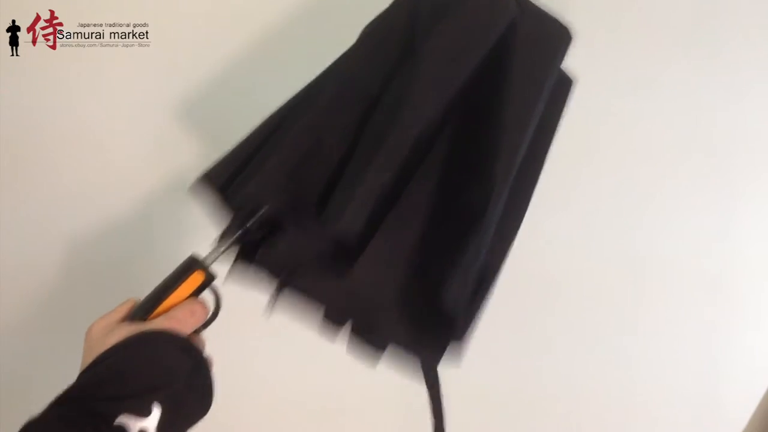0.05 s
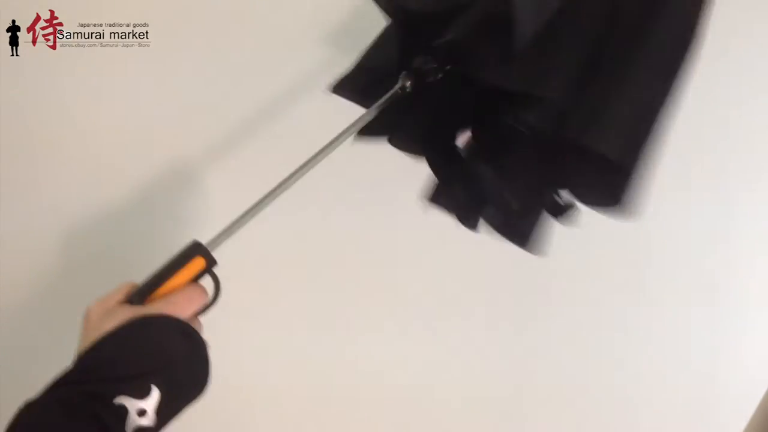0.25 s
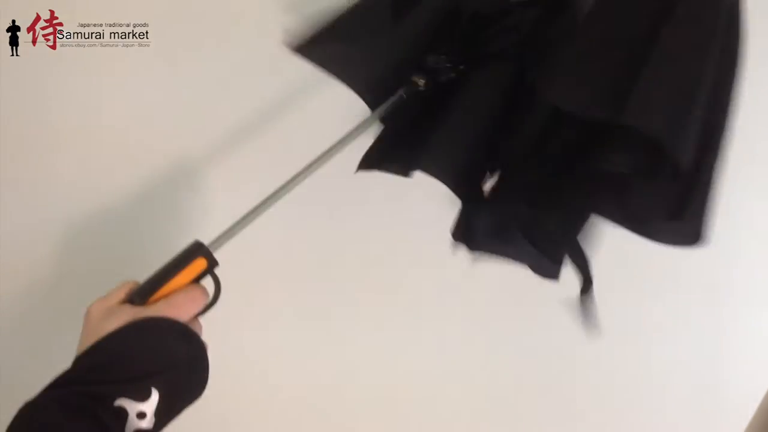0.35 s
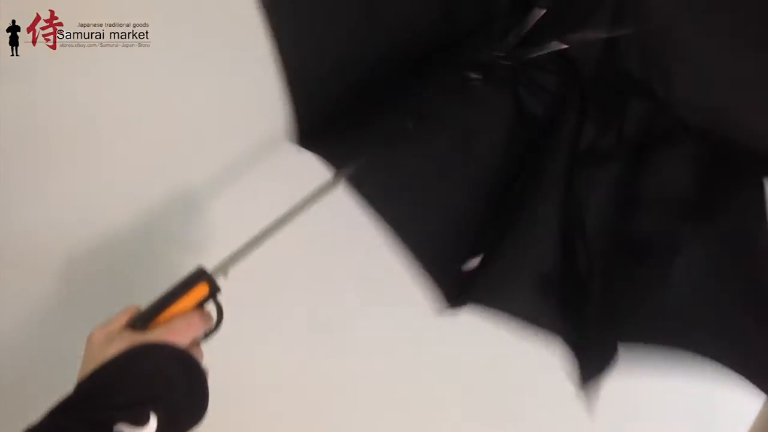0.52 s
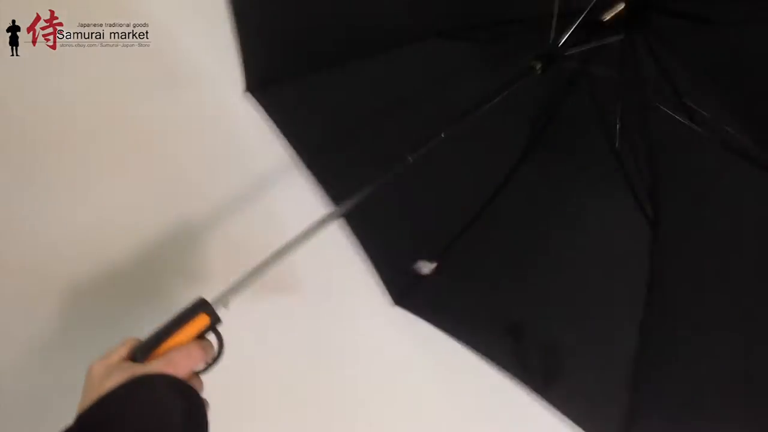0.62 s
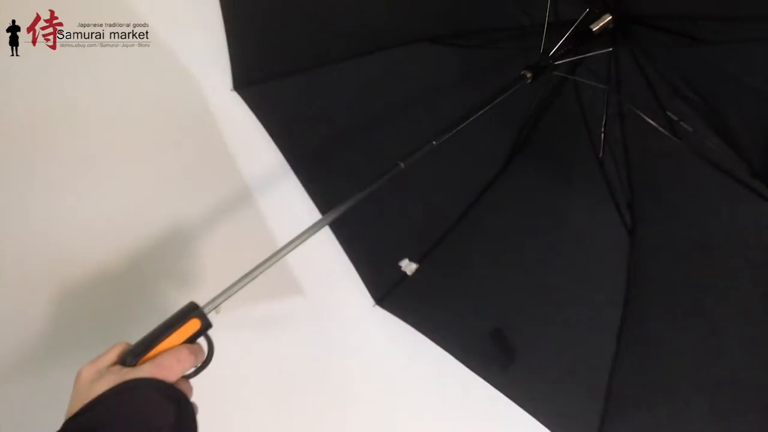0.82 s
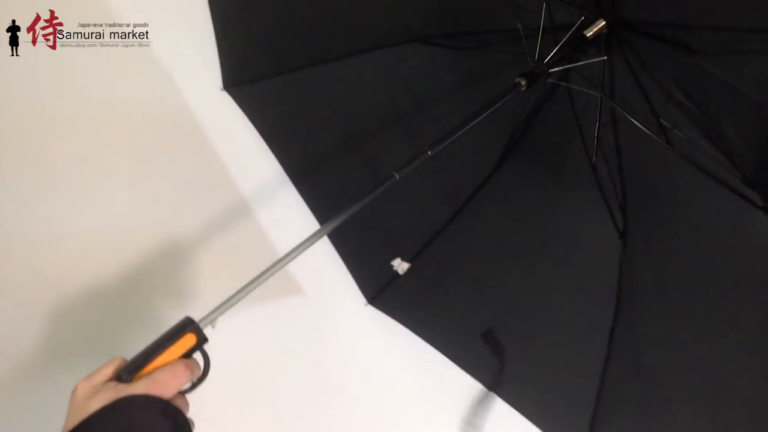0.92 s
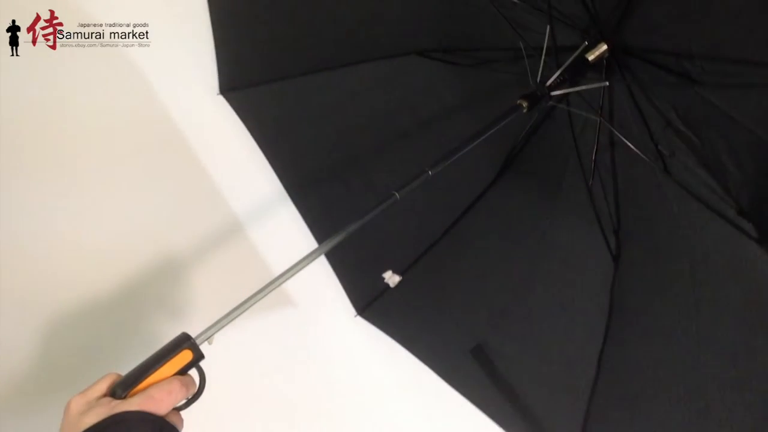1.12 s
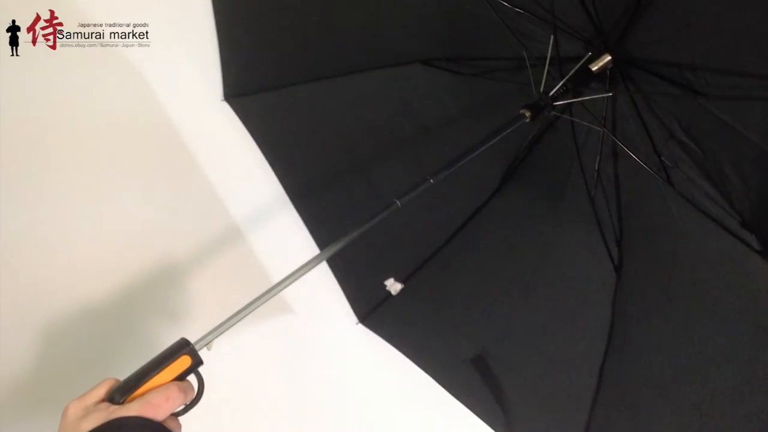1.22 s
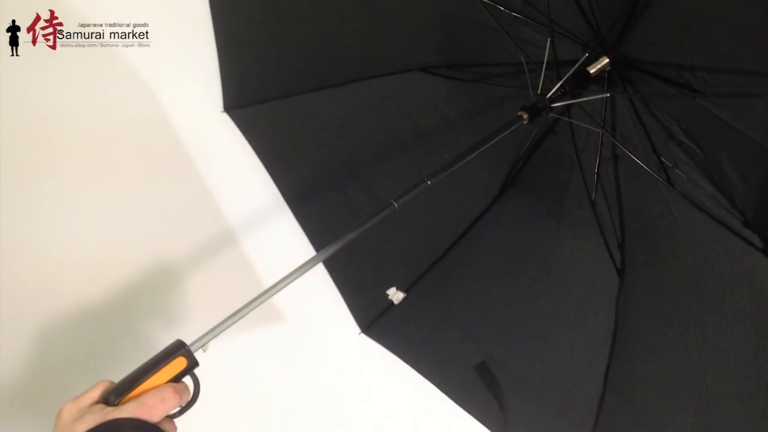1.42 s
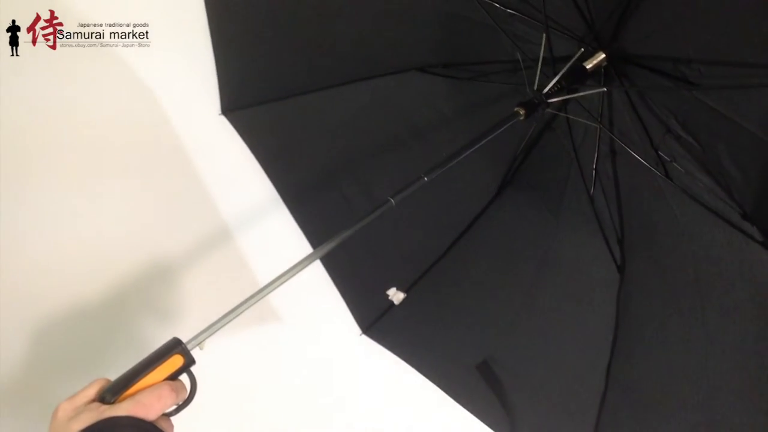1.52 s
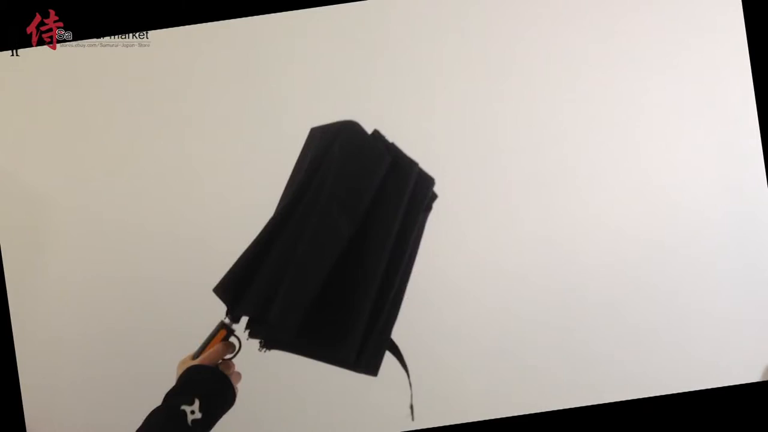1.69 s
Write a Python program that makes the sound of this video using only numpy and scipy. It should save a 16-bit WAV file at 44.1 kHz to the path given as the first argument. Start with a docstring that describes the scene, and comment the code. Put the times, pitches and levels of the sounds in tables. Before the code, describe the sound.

A spring-loaded umbrella clicks, bangs out and snaps open with a swish of nylon.

```python
"""A catch clicks close to the microphone in a small room: a spring-loaded umbrella is opening.
Its telescopic shaft slides out and bangs against the stop, ringing the steel and jolting the handle.
Nylon swishes and flaps as it unfolds, the runner hits home twice and the canopy snaps taut like a drum.
The open frame creaks faintly. A low room rumble lies under it all."""
import sys
import numpy as np
from scipy import signal
from scipy.fft import rfft, irfft
from scipy.io import wavfile

SR = 44100
rng = np.random.default_rng(int(sys.argv[2]) if len(sys.argv) > 2 else 0)


def bounce(signal):
    """Save signal as a 16-bit WAV file at the path given by the first command-line argument."""
    frames = np.transpose(np.atleast_2d(signal))
    limited = np.clip(frames, -1, 1)
    pcm = np.round(limited * 32767).astype(np.int16)
    wavfile.write(sys.argv[1], SR, pcm)


N = 77175
TIME = np.arange(N) / SR


def amp(db):
    """Decibels to gain."""
    return 10 ** (np.asarray(db) / 20)


def unit(x):
    """Scale to rms 1."""
    return x / np.sqrt(np.mean(x ** 2))


def bell(offset, sigma):
    """Gaussian curve of height 1."""
    return np.exp(-.5 * (offset / sigma) ** 2)


def octaves(hz):
    """Distance of every spectrum bin from a frequency, in octaves."""
    return np.log2(np.maximum(np.fft.rfftfreq(N, 1 / SR), 1) / hz)


def colour(points):
    """Join (f/Hz, level/dB) points on a log axis, falling 12 dB per octave below the first."""
    hz, db = np.array(points).T
    return np.interp(octaves(1), np.log2(hz), db) + 12 * np.minimum(octaves(hz[0]), 0)


def tint(x, spectrum_db):
    """Minimum-phase filter with a given spectral shape; the energy is kept."""
    floored_db = np.maximum(spectrum_db, np.max(spectrum_db) - 70)
    cepstrum = irfft(np.log(amp(floored_db)), N)
    cepstrum[1:N // 2] *= 2
    cepstrum[N // 2:] = 0
    filtered = irfft(rfft(x) * np.exp(rfft(cepstrum)), N)
    return unit(filtered) * np.sqrt(np.mean(x ** 2))


def noise(spectrum_db):
    """Steady coloured noise at rms 1."""
    return tint(rng.standard_normal(N), spectrum_db)


def decay(start, t60, hold_s=0):
    """Sudden onset, optional hold and exponential fall."""
    age = TIME - start
    onset = np.clip(age * SR / 8, 0, 1)
    return onset * np.exp(-np.log(1000) * np.maximum(age - hold_s, 0) / t60)


def burst(envelope, spectrum_db):
    """A random push of a given shape, heard through a spectrum."""
    return tint(envelope * rng.choice([-1., 1.], N), spectrum_db)


def cracks(blows, spectrum_db):
    """Each blow excites a dense cluster of quickly dying resonances."""
    return burst(sum(amp(db) * decay(start, t60) for start, db, t60 in blows), spectrum_db)


def ring(start, modes):
    """Decaying modes of a struck part; neighbours swing in opposite senses."""
    age = TIME - start
    return sum((-1) ** k * amp(db) * decay(start, t60) * np.sin(2 * np.pi * hz * age)
               for k, (hz, db, t60) in enumerate(modes))


def puffs(swells, rise_db_oct, fall_db_oct):
    """Short swells of noise, each peaked at its own frequency."""
    out = 0
    for centre, db, sigma, hz in swells:
        away = octaves(hz)
        flanks_db = rise_db_oct * np.minimum(away, 0) - fall_db_oct * np.maximum(away, 0)
        out = out + amp(db) * burst(bell(TIME - centre, sigma), flanks_db)
    return out


# room tone at the microphone: f/Hz, relative level/dB
ROOM_TONE = [(30, -34), (75, -28), (120, -19), (165, -3), (195, -5.5), (230, -11), (370, -12.5),
             (620, -19.5), (900, -26.5), (1300, -31), (4000, -33.5), (13300, -37.5), (14500, -64.5)]

def room_tone(drone_hz=188, drone_width_oct=.07, whine_hz=840):
    """Steady rumble and hiss, with a wavering low drone and a faint whine."""
    drone = noise(-20 * np.log10(1 + (octaves(drone_hz) / drone_width_oct) ** 2))
    whine = unit(np.sin(2 * np.pi * whine_hz * TIME))
    return amp(-59.5) * noise(colour(ROOM_TONE)) + amp(-62.5) * drone + amp(-81.5) * whine


def small_room(direct, wet_db=-16, delay_s=.01, low_t60=.25, treble_t60=.15, split_hz=5000):
    """Diffuse reflections from nearby walls follow the direct sound; the treble dies first."""
    wash = rng.standard_normal(N)
    low = signal.sosfiltfilt(signal.butter(2, split_hz, fs=SR, output="sos"), wash)
    tail = low * decay(delay_s, low_t60) + (wash - low) * decay(delay_s, treble_t60)
    return direct + amp(wet_db) * signal.fftconvolve(direct, tail / np.linalg.norm(tail))[:N]


# faint creaks of the settled frame: t/s, level/dB, t60/s
FRAME_CREAKS = [(1.638, -61.5, 0.013), (1.704, -63, 0.018), (1.727, -54, 0.019)]
# their spectrum: f/Hz, relative level/dB
CREAK_SPECTRUM = [(300, -1), (900, 4.5), (2100, -8.5), (4000, -15), (12000, -26.5)]

def creaks():
    """The open frame shifts slightly in the hand."""
    return cracks(FRAME_CREAKS, colour(CREAK_SPECTRUM))


# swish of shaft and nylon, heard close: t/s, level/dB
SWISH_LEVELS = [(0.123, -52.5), (0.148, -48), (0.192, -42), (0.227, -43.5), (0.252, -30), (.37, -46.5),
                (.44, -45), (.52, -41), (.555, -44), (.585, -46), (.63, -52), (.66, -47), (0.679, -51),
                (.72, -41.5), (.755, -48), (.777, -70)]
# spectrum of swish and ticks: f/Hz, relative level/dB
SWISH_SPECTRUM = [(200, -9.5), (450, -11.5), (800, -13.5), (1500, -8), (2800, -0.5), (4200, 0),
                  (6200, -0.5), (9500, -3), (12500, -8), (15000, -24.5)]
# ribs ticking as they unfold: t/s, level/dB, t60/s
UNFOLDING_TICKS = [(.1582, -39.5, .015), (.2175, -36, .04), (.467, -37, .025)]

def slide(slips_per_s=10000, spread_db=1.5, slack_s=(.555, .685), fade_s=.03, soft_hz=7440):
    """Dense tiny slips of steel and nylon, duller while the cloth is slack, with a few rib ticks."""
    slips = (rng.random(N) < slips_per_s / SR) * rng.standard_normal(N)
    slips *= amp(spread_db * rng.standard_normal(N))
    bright = colour(SWISH_SPECTRUM)
    soft = bright - 12 * np.maximum(octaves(soft_hz), 0)
    slack = np.clip(np.minimum(TIME - slack_s[0], slack_s[1] - TIME) / fade_s, 0, 1)
    rub = (1 - slack) * unit(tint(slips, bright)) + slack * unit(tint(slips, soft))
    times, db = np.array(SWISH_LEVELS).T
    envelope = amp(np.interp(TIME, times, db)) * (TIME > times[0]) * (TIME < times[-1])
    return envelope * rub + cracks(UNFOLDING_TICKS, bright)


# short bright scrapes, then the cloth's snap: t/s, level/dB, sigma/s, centre f/Hz
SCRAPES_AND_SNAP = [(.162, -48, .005, 2980), (.2215, -38, 0.0033, 3260), (.6575, -40, .0013, 3365),
                    (.6635, -44, .002, 2130), (.694, -34, 0.0084, 2850)]

def scrapes_and_snap():
    """Short bright scrapes as the umbrella opens, and the snap of the cloth coming taut."""
    return puffs(SCRAPES_AND_SNAP, rise_db_oct=24, fall_db_oct=24)


# nylon flapping near the microphone: t/s, level/dB, sigma/s, centre f/Hz
PANEL_FLAPS = [(.259, -43.5, 0.0021, 240), (.469, -50, 0.0041, 470), (0.545, -48.5, .006, 900),
               (.550, -38.5, 0.0031, 201), (.557, -47.5, 0.0083, 850), (.573, -44.5, 0.0059, 374),
               (.587, -42, 0.0089, 182), (.6155, -40.5, 0.0065, 370), (.649, -38, .003, 200),
               (.659, -41, 0.0056, 1230), (.664, -36.5, .011, 220), (.696, -30.5, 0.0035, 660),
               (.721, -39.5, 0.013, 600), (.747, -36.5, 0.0061, 230), (.757, -50, 0.0094, 1000)]

def flaps():
    """Each loose panel pushes a short soft puff of air."""
    return puffs(PANEL_FLAPS, rise_db_oct=17, fall_db_oct=11)


# rattle of the folded ribs: t/s, level/dB, t60/s
RIB_RATTLE = [(.256, -32, 0.23)]
# its spectrum: f/Hz, relative level/dB
RATTLE_SPECTRUM = [(250, -9), (800, -3.5), (2000, -3.5), (3200, -4.5), (4200, 8.5), (6000, -6.5),
                   (9500, -5), (14000, -16)]
# ring of the stretchers: f/Hz, relative level/dB, t60/s
STRETCHER_MODES = [(2632, -4, 0.077), (2866, -4.5, 0.033), (4870, -1.5, .08)]

def ribs():
    """The ribs rattle after the shaft's blow; the stretchers lock and ring at the runner's last hit."""
    lock_s = RUNNER_HITS[-1][0]
    return cracks(RIB_RATTLE, colour(RATTLE_SPECTRUM)) + amp(-32.5) * ring(lock_s, STRETCHER_MODES)


# click of the button catch: t/s, level/dB, t60/s
CATCH_CLICK = [(.1215, -31.5, 0.042)]
# its spectrum: f/Hz, relative level/dB
CATCH_SPECTRUM = [(200, -12.5), (550, -12), (1200, -8), (1900, -10), (2600, -1.5), (3300, -1), (4600, -11),
                  (7000, -11.5), (10500, -15), (14500, -25)]

def catch():
    """The catch lets go of the sprung shaft with one click."""
    return cracks(CATCH_CLICK, colour(CATCH_SPECTRUM))


# jolts in the handle: t/s, level/dB, t60/s
HANDLE_JOLTS = [(.2469, -23, 0.018), (.257, -36, 0.18)]
# their spectrum: f/Hz, relative level/dB
JOLT_SPECTRUM = [(220, -13), (340, -7.5), (520, -7), (790, -1.5), (950, -12), (1150, 0), (1750, -13),
                 (2300, -21.5), (5000, -45)]
# hollow ring of the handle: f/Hz, relative level/dB, t60/s
HANDLE_MODES = [(772, -2, .16), (871, -2, 0.083), (1180, -6, .12), (1464, 0, .08), (1740, -0.5, 0.08)]

def handle(blow_s):
    """The handle takes the shaft's hardest blow and rings hollow."""
    return cracks(HANDLE_JOLTS, colour(JOLT_SPECTRUM)) + amp(-32) * ring(blow_s, HANDLE_MODES)


# shaft sections hitting their stops at close range: t/s, level/dB, t60/s
SHAFT_BLOWS = [(0.2455, -17, .04), (.2464, -11.5, 0.019), (0.2497, -21, 0.023)]
# their spectrum: f/Hz, relative level/dB
SHAFT_SPECTRUM = [(500, -24), (1500, -12.5), (3000, -6.5), (3900, 0), (5200, 0), (7800, -2.5), (9300, 1.5),
                  (13300, -6.5), (15500, -16)]
# ring of the steel shaft and ribs: f/Hz, relative level/dB, t60/s
STEEL_MODES = [(3835, -1, .22), (4050, -3, .24), (4129, -2, .26), (4240, -4, .26), (4549, -6, .2),
               (4845, -5, .22), (5021, -3, .18), (5226, -2, .24), (5659, -5, .15), (6468, -2, .15),
               (7131, -3, .16), (9064, -2, .15), (10969, -2, .12)]

def shaft(blow_s, blow_db):
    """The sections slam into their stops; the hardest blow rings the steel."""
    steel = amp(blow_db - 29) * ring(blow_s, STEEL_MODES)
    return cracks(SHAFT_BLOWS, colour(SHAFT_SPECTRUM)) + steel


# runner hitting home: t/s, level/dB, t60/s, bright peak f/Hz
RUNNER_HITS = [(0.6831, -12, 0.0029, 6780), (.691, -15, 0.0039, 11000)]
# spectrum of hits and chatter: f/Hz, relative level/dB
RUNNER_SPECTRUM = [(400, -58), (2800, -30), (4000, 1.5), (7000, 3), (11500, 4.5), (13000, -4.5),
                   (15500, -11)]

def runner(peak_db=15, peak_sigma_oct=.069, chatter_t60=.043):
    """Two hard ticks, each followed by the chatter of the rib joints."""
    out, body = 0, colour(RUNNER_SPECTRUM)
    for start, db, t60, hz in RUNNER_HITS:
        bright = body + peak_db * bell(octaves(hz), peak_sigma_oct)
        tick = amp(db) * burst(decay(start, t60, hold_s=.00055), bright)
        chatter = cracks([(start, db - 6, chatter_t60)], body)
        out = out + tick + chatter
    return out


# tugs as the cloth comes taut by the microphone: t/s, relative pressure, sigma/s
CANOPY_TUGS = [(.695, .07, .0006), (.6976, -.17, .0004)]
# drum modes of the canopy: f/Hz, relative level/dB, t60/s
CANOPY_MODES = [(125.5, -11.5, 0.5), (158.3, -1, .45), (231.3, 4.5, .11), (268, 2, .11), (1077, -6, 0.0777)]

def canopy(taut_s=.6935, low_cut_hz=147):
    """The cloth jerks taut, recoils and booms; it is too light to radiate deep bass."""
    tugs = sum(pressure * bell(TIME - centre, sigma) for centre, pressure, sigma in CANOPY_TUGS)
    boom = amp(-29.5) * ring(taut_s, CANOPY_MODES)
    return signal.sosfilt(signal.butter(2, low_cut_hz, "high", fs=SR, output="sos"), tugs + boom)


def scene():
    """The umbrella opens in a small room, close to a single microphone."""
    blow_s, blow_db, _ = max(SHAFT_BLOWS, key=lambda blow: blow[1])  # the hardest blow
    mechanism = handle(blow_s) + catch() + shaft(blow_s, blow_db) + runner()
    umbrella = mechanism + slide() + scrapes_and_snap() + flaps() + canopy() + creaks() + ribs()
    return (small_room(umbrella) + room_tone())[None]


def record(dry, bass_hz=60, top_hz=15100):
    """A small microphone thins the bass; the top is cut steeply."""
    thin = signal.sosfilt(signal.butter(1, bass_hz, "high", fs=SR, output="sos"), dry)
    return signal.sosfilt(signal.ellip(8, .2, 70, top_hz, fs=SR, output="sos"), thin)


dry = scene()
out = record(dry)
bounce(out)
```